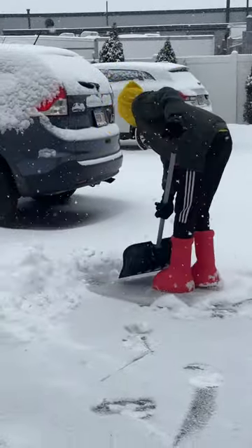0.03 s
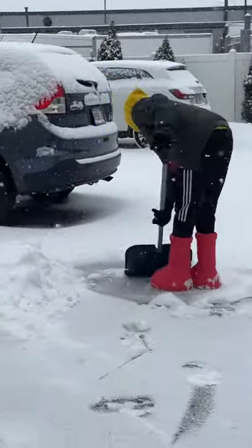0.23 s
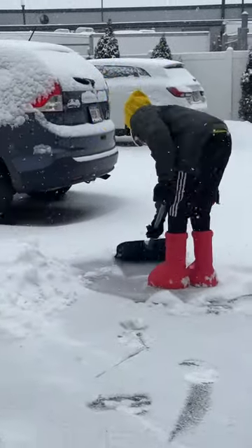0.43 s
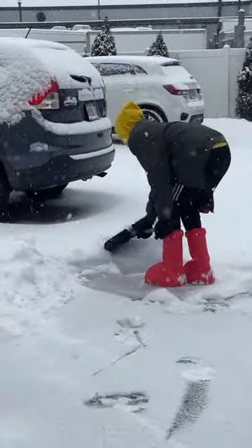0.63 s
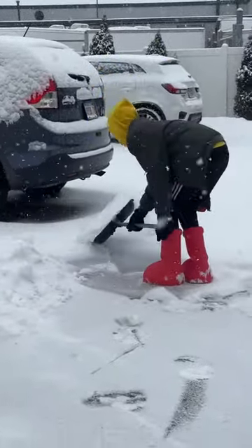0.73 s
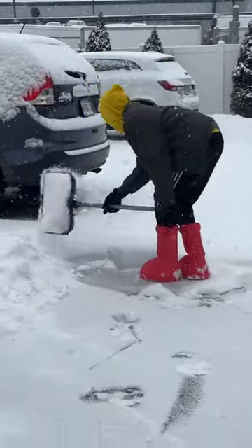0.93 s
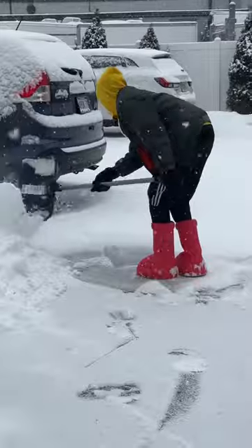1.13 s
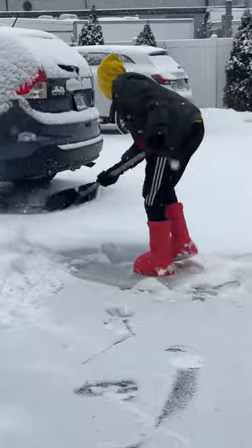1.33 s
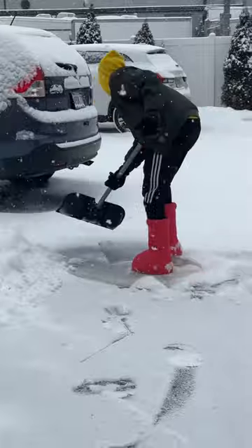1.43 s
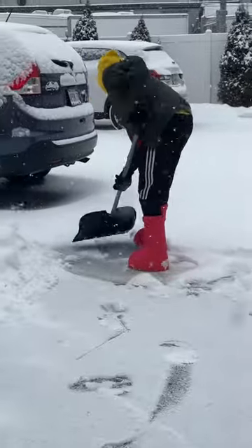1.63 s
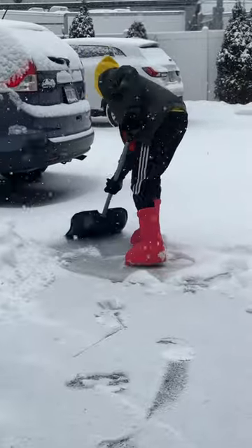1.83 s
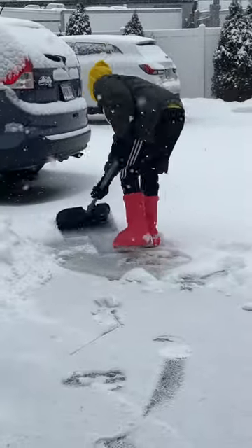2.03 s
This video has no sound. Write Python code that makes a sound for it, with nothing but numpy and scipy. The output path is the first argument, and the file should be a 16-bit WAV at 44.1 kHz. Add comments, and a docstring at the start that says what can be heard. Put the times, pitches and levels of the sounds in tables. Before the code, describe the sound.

Snow shovel scraping on thinly snowed asphalt, two brief rough pushes with sharp edge knocks

```python
"""A car park, its asphalt thinly covered in snow: a plastic snow shovel is set down and pushed twice.
Grit under the edge is dense clicks that shake the blade, which rings in short broad modes; knocks are noise bursts.
Cars and a fence throw back a short tail, made of fading noise.
Far traffic rumbles and hisses underneath as coloured noise. A phone with two microphone ports listens."""
import sys
import numpy as np
from scipy import signal
from scipy.fft import rfft, irfft, next_fast_len
from scipy.io import wavfile

SR = 44100
rng = np.random.default_rng(int(sys.argv[2]) if len(sys.argv) > 2 else 0)


def rack_gain(trim_db):
    """Turn a fader trim in dB into the linear factor to multiply a signal by."""
    fader = np.asarray(trim_db, float)
    return 10 ** (fader / 20)


def inscribe(sig):
    """Save sig as 16-bit PCM at rate SR to the path in sys.argv[1].

    A 1-D sig is mono; a 2-D sig holds one channel per row.
    Samples are clipped to [-1, 1] before scaling.
    """
    pcm = np.round(np.clip(np.atleast_2d(sig).T, -1, 1) * 32767)
    wavfile.write(sys.argv[1], SR, pcm.astype(np.int16))


N = 92565  # length in samples


def rms_one(x):
    """Scale to unit rms."""
    return x / np.sqrt(np.mean(x ** 2) + 1e-20)


def at_hz(points, hz):
    """Read a table on a log-frequency axis."""
    table_hz, values = np.transpose(points)
    return np.interp(np.log(np.maximum(hz, 1)), np.log(table_hz), values)


def drift(rate_hz):
    """Slow random wandering of spread 1: noise through a low-pass, made at an eighth of the sample rate."""
    r = np.exp(-16 * np.pi * rate_hz / SR)
    slow = signal.lfilter([1], [1, -2 * r, r * r], rng.standard_normal(N // 8 + 3002))
    slow = rms_one(slow[3000:])  # skip the filter's start
    return np.interp(np.arange(N) / 8, np.arange(len(slow)), slow)


def colour(x, spectrum):
    """Filter to the given spectrum without sounding ahead of time (causal, minimum-phase)."""
    size = next_fast_len(N + SR // 2)
    gain = rack_gain(at_hz(spectrum, np.fft.rfftfreq(size, 1 / SR)))
    cepstrum = irfft(np.log(gain), size)
    # folding the cepstrum forward in time gives the minimum phase
    cepstrum[1:size // 2] *= 2
    cepstrum[size // 2 + 1:] = 0
    return irfft(rfft(x, size) * np.exp(rfft(cepstrum)), size)[..., :N]


def cut(x, hz, kind):
    """Butterworth low- or high-pass without phase shift, so that the parts add up again."""
    return signal.sosfiltfilt(signal.butter(2, hz, kind, fs=SR, output="sos"), x)


def resonance(x, hz, width_hz):
    """Something that rings at one pitch: a two-pole resonance, gain 1 on top."""
    r = np.exp(-np.pi * width_hz / SR)
    poles = [1, -2 * r * np.cos(2 * np.pi * hz / SR), r * r]
    return signal.lfilter([(1 - r * r) / 2, 0, (r * r - 1) / 2], poles, x + 1e-18)


# how alike left and right are in the traffic noise: f/Hz, likeness (1 same, 0 unrelated, -1 opposite)
LIKENESS = [(60, 0.99), (190, 0.97), (620, .66), (1400, .65), (6000, 0.9), (9000, -0.82), (15000, -.6)]


def stereo_noise(spectrum):
    """Coloured noise whose left and right are as alike as the table says at each frequency; rms 1."""
    mid, side = rfft(rng.standard_normal((2, N)))
    alike = np.clip(at_hz(LIKENESS, np.fft.rfftfreq(N, 1 / SR)), -1, 1)
    pair = irfft(np.sqrt(1 + alike) * mid + np.sqrt(1 - alike) * side * [[1], [-1]], N)
    return rms_one(colour(pair, spectrum))


# loudness of the traffic rumble over time: t/s, level/dB
RUMBLE_LEVEL = [(0.0, -38), (0.04, -34.5), (0.17, -35), (0.48, -35), (0.5, -32), (0.89, -34), (1.04, -30.5),
                (1.21, -35), (1.36, -25.5), (1.45, -35), (1.53, -27.5), (1.58, -32), (1.71, -25),
                (1.73, -25.5), (1.85, -21), (1.89, -29), (2.09, -31), (2.1, -50)]
# spectrum of the rumble, before scaling to rms 1: f/Hz, level/dB
RUMBLE_SPECTRUM = [(13, -46.5), (24, -13), (33, -15), (42, -10), (53, -2.3), (75, -4.5), (108, -10.5),
                   (135, -14.5), (200, -29.5), (290, -64.5), (480, -120)]


def traffic_rumble():
    """Far traffic's low part: bass noise that swells and sinks."""
    level_db = np.interp(np.arange(N) / SR, *np.transpose(RUMBLE_LEVEL))
    return rack_gain(level_db) * stereo_noise(RUMBLE_SPECTRUM)


# spectrum of the hiss, before scaling to rms 1: f/Hz, level/dB
HISS_SPECTRUM = [(88, -8), (150, -7), (300, -10), (680, -18), (1030, -23.5), (2380, -29), (4000, -39),
                 (6500, -45.5), (9000, -56.5), (15500, -62.5)]
# swell of the hiss, added to its base level: t/s, level/dB
HISS_RISE = [(0, 0.5), (0.3, 7), (0.9, -0.4), (1.5, 0), (2.1, 5.3)]
HISS_BASE_DB = -46.5


def traffic_hiss():
    """Far traffic's wider noise, with a slow swell and a small random wander of 1 dB."""
    swell_db = np.interp(np.arange(N) / SR, *np.transpose(HISS_RISE))
    return rack_gain(HISS_BASE_DB + swell_db + drift(2.4)) * stereo_noise(HISS_SPECTRUM)


TAIL_DB, TAIL_T60_S, TAIL_CUT_HZ = -29.5, 0.81, 7500


def echoes(x):
    """Diffuse dull return from cars and fence: fading noise, its own in each channel, ended at half a second."""
    t = np.arange(SR // 2) / SR
    tail = rng.standard_normal((2, len(t))) * rack_gain(-60 * t / TAIL_T60_S)
    tail *= t > .012  # nothing returns in the first 12 ms
    tail = signal.lfilter([1], [1, -np.exp(-2 * np.pi * TAIL_CUT_HZ / SR)], tail)
    tail /= np.sqrt(np.sum(tail ** 2, axis=1, keepdims=True))
    return rack_gain(TAIL_DB) * signal.fftconvolve(x[None], tail, axes=1)[:, :N]


# how much louder the left port is: f/Hz, level/dB
LEFT_OVER_RIGHT = [(100, 4.1), (370, -0.5), (580, 6), (910, 1.5), (1440, 2), (3000, -0.1)]
# how far the left port leads: f/Hz, phase/rad
LEFT_LEAD = [(100, 0.05), (430, 0.23), (700, 0.054), (3500, 0.14), (6000, .9), (8000, 1.31), (10000, 2.79),
             (15000, 1.5)]


def ports(x):
    """A near source reaches the two ports with a level and phase step, half of it given to each side."""
    size = next_fast_len(N + 4096)
    hz = np.fft.rfftfreq(size, 1 / SR)
    half = rack_gain(at_hz(LEFT_OVER_RIGHT, hz) / 2) * np.exp(.5j * at_hz(LEFT_LEAD, hz))
    return irfft(rfft(x, size) * np.array([half, 1 / half]), size)[:, :N]


# ringing modes of the plastic blade: f/Hz, width/Hz, level/dB
BLADE_MODES = [(350.4, 50, 1), (442, 38, 2.7), (527, 110, -4.5), (694, 150, -0.5), (880, 22, -1),
               (975, 60, -4), (1179, 177, 4), (1466, 163, 3.5), (1689, 147, 7), (1904, 196, -5.2),
               (2235, 270, -2), (2878, 340, -6.5), (3713, 830, 1)]
# overall colour of the scraping, a filter: f/Hz, level/dB
SCRAPE_COLOUR = [(70, -37.5), (120, 4), (243, 2.5), (335, -0.1), (730, 1), (1020, -2.5), (1710, -8),
                 (2800, -8), (4000, -21.5), (5200, -22), (7500, -25), (10500, -23), (15500, -36)]
MODE_WANDER_DB, MODE_WANDER_HZ = 2.8, 22
FLAT_DB = -4  # the part that passes without ringing


def blade(x):
    """Broad modes over a flat part; each mode's share wanders as the contact moves along the edge."""
    sound = rack_gain(FLAT_DB) * x
    for hz, width_hz, db in BLADE_MODES:
        share_db = db + MODE_WANDER_DB * drift(MODE_WANDER_HZ)
        sound = sound + resonance(x * rack_gain(share_db), hz, width_hz)
    return colour(sound, SCRAPE_COLOUR)


GRITS_PER_S, GRIT_SPREAD_DB = 9000, 3.0
JUDDER_DB, JUDDER_HZ = 0.34, 30


def grit():
    """Dense clicks of uneven size, one per grain, with a slight judder in level; rms 1."""
    size_db = GRIT_SPREAD_DB * np.minimum(rng.exponential(1, N), 4)
    sizes = rack_gain(size_db) * rng.choice([-1, 1], N)
    hits = rng.random(N) < GRITS_PER_S / SR
    return rms_one(sizes * hits * rack_gain(JUDDER_DB * drift(JUDDER_HZ)))


# pressure of the edge on the ground, one list per push:
# t/s, scrape level/dB, low boom level/dB, middle ring level/dB, grit brightness level/dB
PUSHES = [
    [(0.131, -44.5, 3.5, 35, 5.5), (0.142, -30.5, 5, 9, 9), (0.156, -37.5, 12, -4.5, 6.5),
     (0.22, -32, 6, -41, 6.5), (0.23, -28, 10.5, -1, 10), (0.288, -16, -5.5, 7, 3.5),
     (0.33, -21, 5, 3.5, 6.5), (0.37, -21, -11.5, 17, 12.5), (0.386, -17, -7, -22.5, 1),
     (0.41, -21.5, -18, 16, 8), (0.478, -14, -12.5, -12.5, -3), (0.5, -21.5, -13, 7.5, 3.5),
     (0.532, -23.5, -4, 11.5, -5), (0.548, -39.5, -14.5, 18, 4), (0.58, -47, -5, -1, 6)],
    [(1.719, -21.5, -17, -28.5, -28.5), (1.732, -34, 6, -20.5, 3.5), (1.745, -32, -1.5, -3, 14),
     (1.764, -25, 4.5, -14, -2.5), (1.773, -48, 20, 14, 10.5), (1.792, -43, 10.5, -6, 12),
     (1.797, -22, -0.5, 0.5, 4), (1.823, -28.5, 6.5, 6.7, 6), (1.87, -24, -2.5, 3, 6.5),
     (1.95, -19, -4, 0.5, 4.5), (1.99, -23.5, -3, 12.5, 10.5), (2.039, -25.5, -5, 9.5, 7),
     (2.099, -24.5, 5, -4.5, 3)],
]
BOOM_TOP_HZ, GRIT_LOW_HZ = 503, 3000  # where the low part ends and the bright part starts
BOOM_HZ, BOOM_WIDTH_HZ, BOOM_PEAK_DB = 335, 50, 6
RING_HZ, RING_WIDTH_HZ = 715, 100


def pushes():
    """Grit scraped by the edge; its low, ringing and bright parts change with the pressure."""
    t, grains = np.arange(N) / SR, grit()
    low, high = cut(grains, BOOM_TOP_HZ, "low"), cut(grains, GRIT_LOW_HZ, "high")
    middle = grains - low - high
    low = low + rack_gain(BOOM_PEAK_DB) * resonance(grains, BOOM_HZ, BOOM_WIDTH_HZ)
    ring = resonance(grains, RING_HZ, RING_WIDTH_HZ)
    drive = np.zeros(N)
    for push in PUSHES:
        s, db, *shares_db = np.transpose(push)
        boom, ringing, bright = (rack_gain(np.interp(t, s, share_db)) for share_db in shares_db)
        # the middle already holds the ring once, hence the -1
        mixture = middle + boom * low + (ringing - 1) * ring + bright * high
        drive += mixture * rack_gain(np.interp(t, s, db, left=-120, right=-120))
    return drive


# knocks of the edge on ground or stone: t/s, level/dB, low boom level/dB, crack level/dB
EDGE_KNOCKS = [(0.131, -19.5, -5, 9.5), (0.226, -25.5, 10.2, 11.5), (0.283, -35.5, 3, 9),
               (0.378, -19, -8, 28.5), (0.476, -8.5, -8, 8.7), (0.511, -14.5, -17, 3.5),
               (0.532, -19, -10.5, -2), (1.05, -44.5, 1.5, -6), (1.597, -36.5, 10, 18),
               (1.719, -18.5, -2.5, 18), (1.745, -26.5, 9.8, 12), (1.797, -16, -10.5, -12),
               (1.866, -12.5, -1, -1.5), (2.05, -28.5, -17, 7)]
KNOCK_T60_S = .011
TAP_HZ, TAP_WIDTH_HZ = 1500, 4000
THUD_HZ = 400  # both pitch and width
CRACK_HZ, CRACK_WIDTH_HZ = 5300, 2200


def knocks(noise):
    """Very short fading noise bursts, each heard as a tap, a low thud and a sharp crack."""
    t = np.arange(N) / SR
    taps, thuds, cracks = np.zeros((3, N))
    for s, db, boom_db, crack_db in EDGE_KNOCKS:
        burst = noise * rack_gain(db - 60 * np.maximum(t - s, 0) / KNOCK_T60_S) * (t >= s)
        taps += burst
        thuds += rack_gain(boom_db) * np.abs(burst)  # a one-way push holds more bass
        cracks += rack_gain(crack_db) * burst
    tap = resonance(taps, TAP_HZ, TAP_WIDTH_HZ)
    thud = resonance(thuds, THUD_HZ, THUD_HZ)
    return tap + thud + resonance(cracks, CRACK_HZ, CRACK_WIDTH_HZ)


def shovel():
    """Scraped grit and knocks of the edge, all ringing through the blade."""
    scraping = pushes()
    noise = rng.choice([-1., 1.], N)
    scale = 1 / np.sqrt(np.mean(blade(noise) ** 2))  # steady noise would leave the blade at rms 1
    return scale * blade(scraping + knocks(noise))


def scene():
    """Traffic rumble and hiss, the shovel and its echoes."""
    near = shovel()
    rumble = traffic_rumble()
    hiss = traffic_hiss()
    return ports(near) + echoes(near) + rumble + hiss


def roll_off(x):
    """The treble ends steeply here."""
    return signal.sosfilt(signal.butter(12, 15850, fs=SR, output="sos"), x)


MONO_LOW_HZ, MONO_HIGH_HZ = 1383, 6160
SIDE_ONLY_LOW_HZ, SIDE_ONLY_HIGH_HZ = 10360, 14900


def record(dry):
    """The middle range is heard in mono, and a band of the top octave only as left-minus-right."""
    hz = np.fft.rfftfreq(N, 1 / SR)
    keep_mid = (hz < SIDE_ONLY_LOW_HZ) | (hz > SIDE_ONLY_HIGH_HZ)
    keep_side = (hz < MONO_LOW_HZ) | (hz > MONO_HIGH_HZ)
    mid = irfft(rfft((dry[0] + dry[1]) / 2) * keep_mid, N)
    side = irfft(rfft((dry[0] - dry[1]) / 2) * keep_side, N)
    return roll_off(np.array([mid + side, mid - side]))


dry = scene()
out = record(dry)
inscribe(out)
```